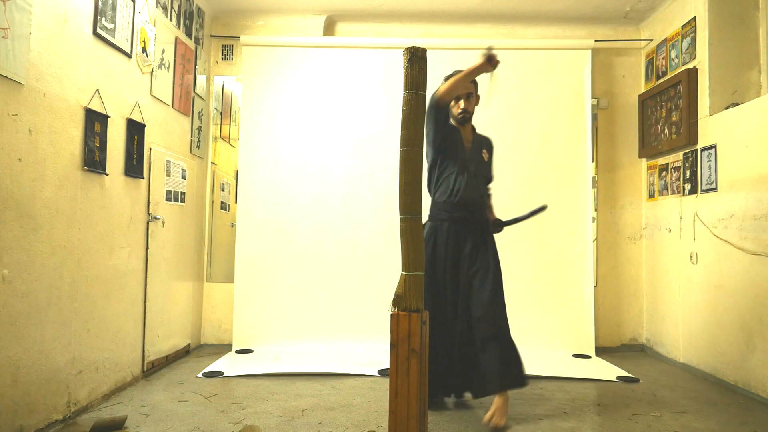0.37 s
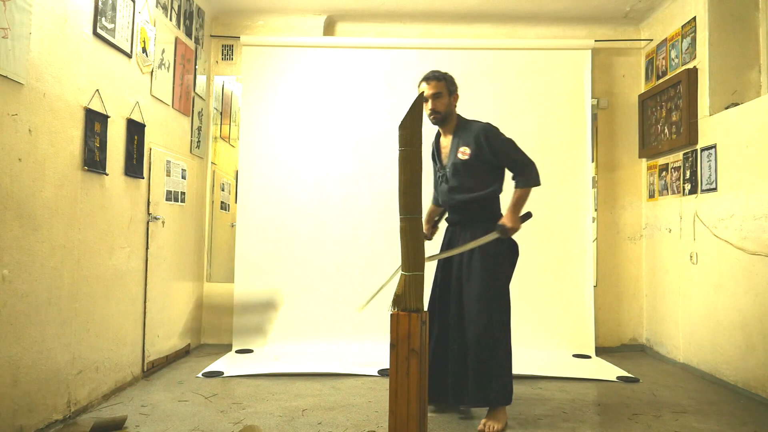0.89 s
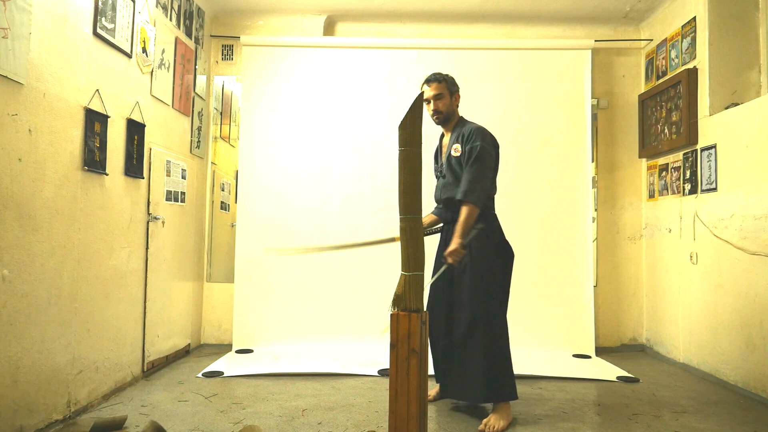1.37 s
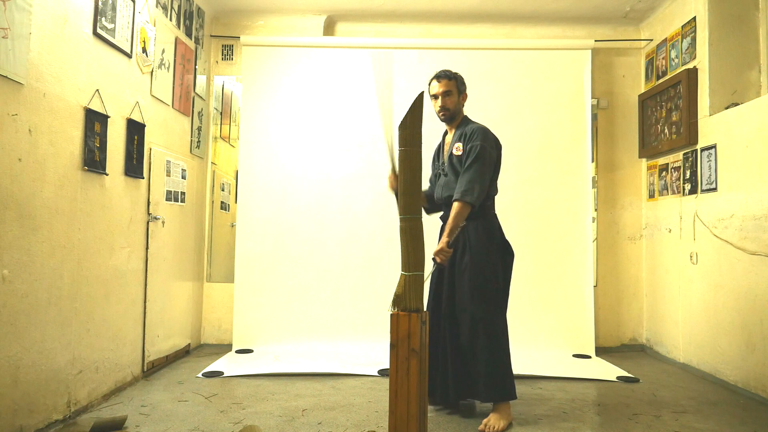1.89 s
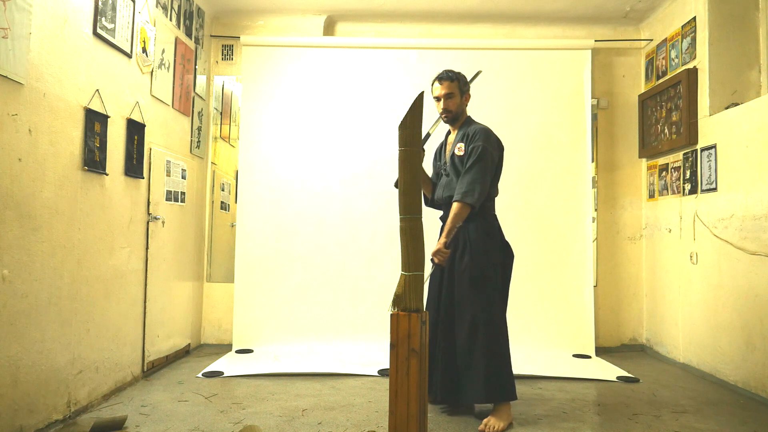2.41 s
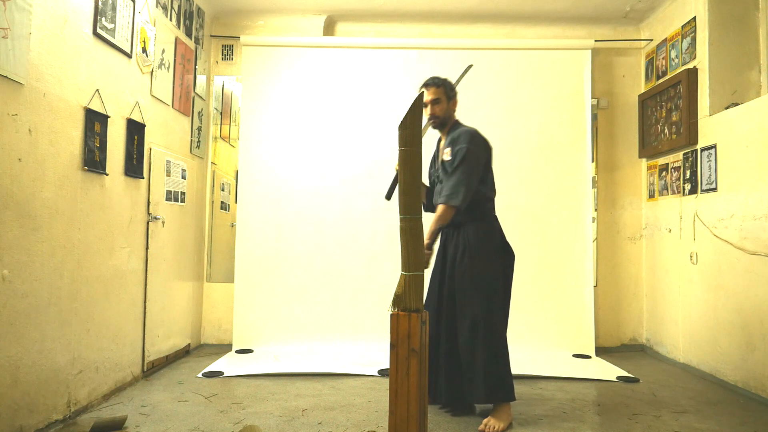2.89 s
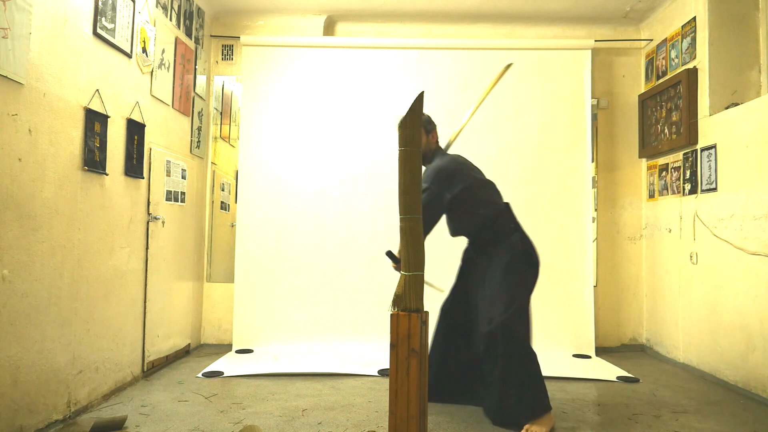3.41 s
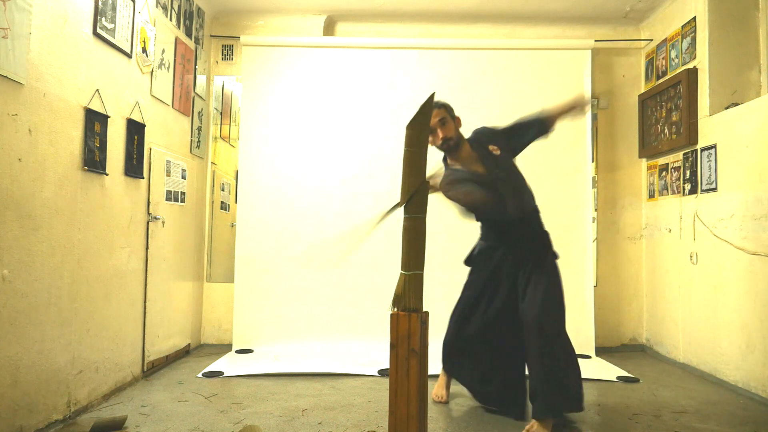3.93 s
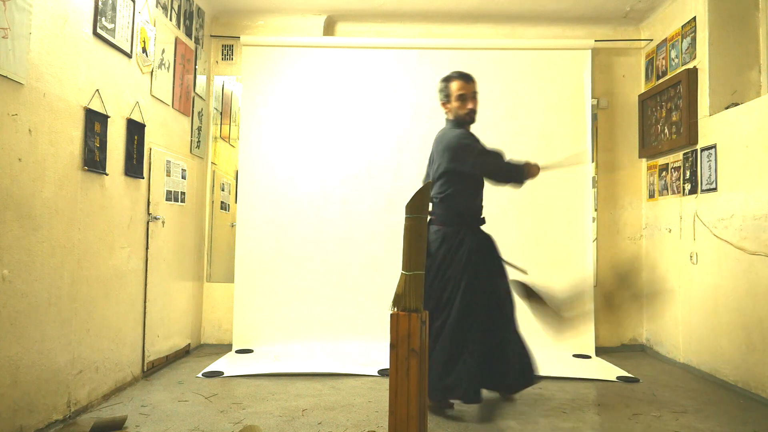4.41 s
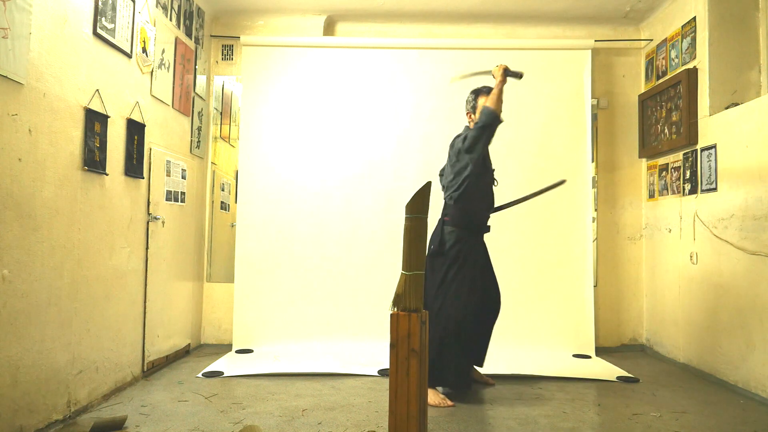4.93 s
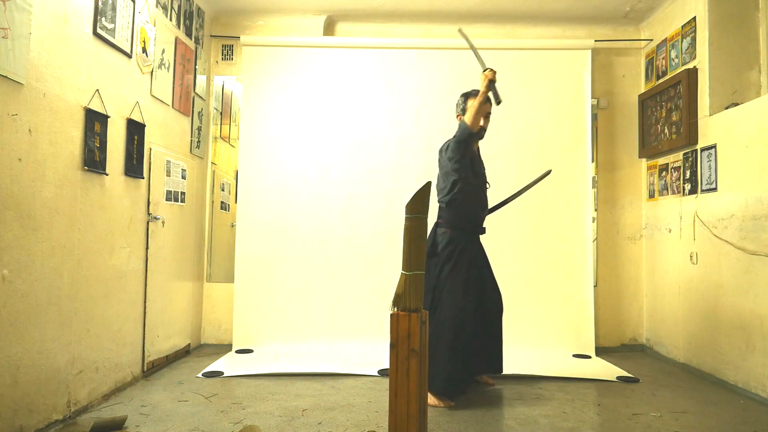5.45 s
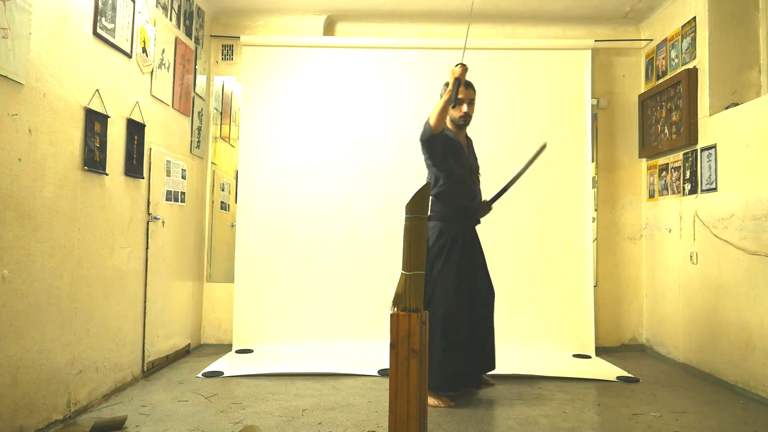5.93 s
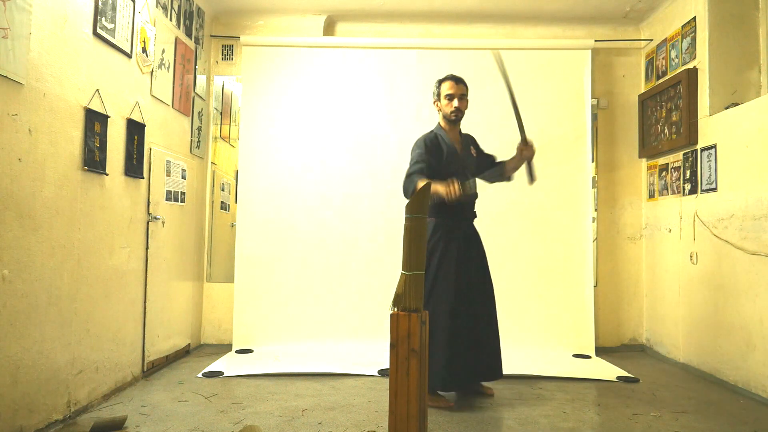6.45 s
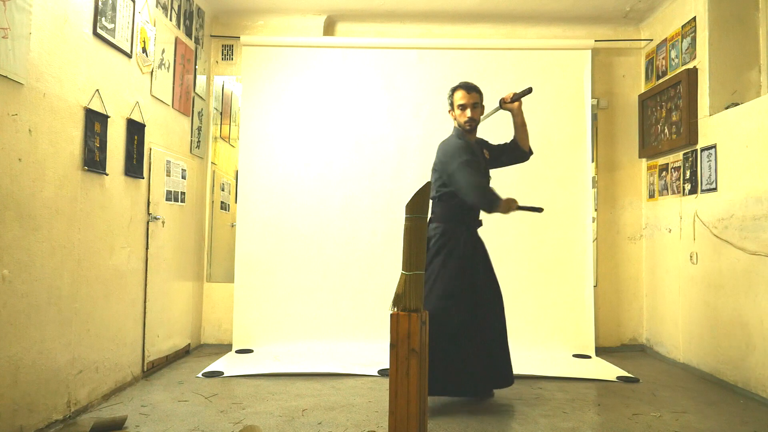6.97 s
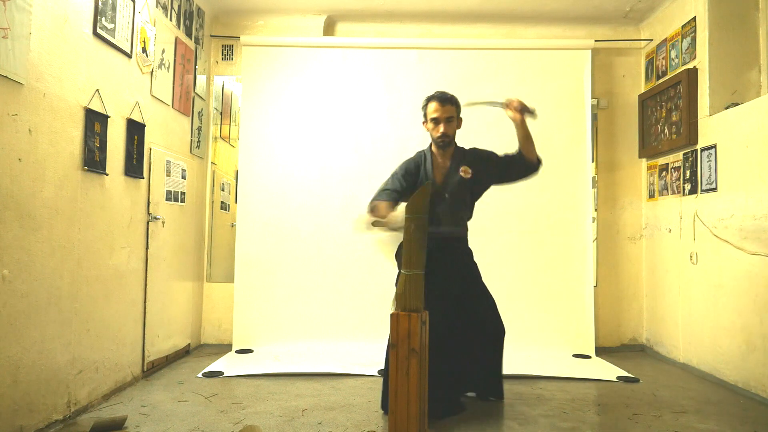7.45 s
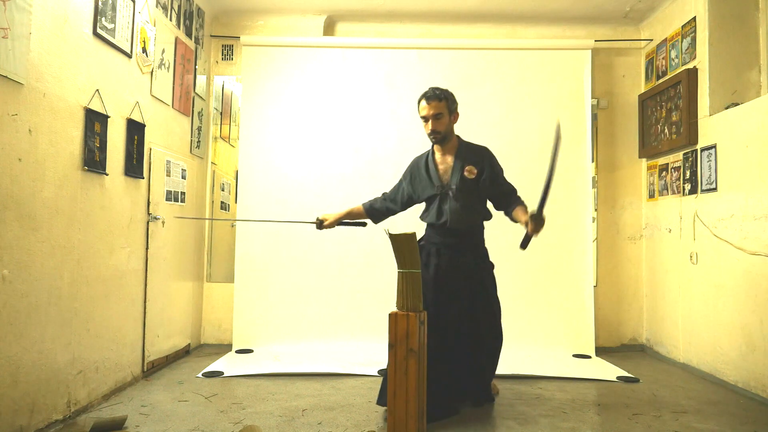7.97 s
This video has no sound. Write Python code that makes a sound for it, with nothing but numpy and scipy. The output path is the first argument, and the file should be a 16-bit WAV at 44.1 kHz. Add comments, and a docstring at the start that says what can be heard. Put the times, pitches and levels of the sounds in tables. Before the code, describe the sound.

Short whistling sword swishes end in crisp cracks through a rolled straw mat; cut pieces thump, tumble and bang in a bare, echoing room.

```python
"""A blade cuts a rolled straw mat in a bare concrete hall: it swishes, the fibres crack, the stump knocks.
Cut pieces land, tumble and slide as shaped noise, and one bangs into a hard panel; solid knocks are struck
resonances. All feed a dense noise hall. Feet and cloth rustle over a faint hum and hiss; the recorder's
gain control leans on the loudest hits and lets go as they fade."""
import sys
import numpy as np
from scipy import signal
from scipy.fft import rfft, irfft
from scipy.io import wavfile

SR = 44100
rng = np.random.default_rng(int(sys.argv[2]) if len(sys.argv) > 2 else 0)


def wav_out(sig):
    """Save sig, one row per channel (or a flat mono array), as 16-bit PCM at SR to the path in sys.argv[1]."""
    wavfile.write(sys.argv[1], SR, np.round(np.clip(np.atleast_2d(sig).T, -1, 1) * 32767).astype(np.int16))


def invert_db(level):
    """Linear amplitude ratio for a level in decibels (20 dB per decade), elementwise."""
    return 10 ** (np.asarray(level, dtype=float) / 20)


N = 357210
TIME = np.arange(N) / SR


def rms_one(x):
    """Scale to rms 1."""
    return x / np.sqrt(np.mean(x ** 2) + 1e-20)


def at_hz(points, hz):
    """Read a table on a log-frequency axis."""
    f, value = np.transpose(points)
    return np.interp(np.log(hz), np.log(f), value)


def band(x, low_hz, high_hz):
    """Butterworth band-pass."""
    return signal.sosfilt(signal.butter(2, [low_hz, high_hz], "band", fs=SR, output="sos"), x)


def resonance(x, hz, width_hz):
    """Two-pole resonance, gain about 1 on top."""
    r = np.exp(-np.pi * width_hz / SR)
    feedback = [1, -2 * r * np.cos(2 * np.pi * hz / SR), r * r]
    return signal.lfilter([(1 - r * r) / 2, 0, (r * r - 1) / 2], feedback, x)


def narrow(hz, width_hz):
    """A resonance applied twice: steep skirts."""
    return lambda x: resonance(resonance(x, hz, width_hz), hz, width_hz)


def late(x, s):
    """Delay by s seconds."""
    return np.pad(x, ((0, 0), (round(s * SR), 0)))[:, :N]


def drift(rate):
    """Slow random wander: straight lines between normal draws, rate of them per second."""
    count = int(N / SR * 40)
    return np.interp(TIME * rate, np.arange(count), rng.standard_normal(count))


# stereo width of the steady noises: f/Hz, side over mid level/dB
AIR_SIDE = [(40, 6), (150, 9.5), (500, 7.5), (3000, -4.5), (12000, -9.5)]


def coloured(spectrum):
    """Steady stereo noise of a given spectrum, rms 1."""
    hz = np.maximum(np.arange(N // 2 + 1) * SR / N, 10)
    white = rfft(rng.standard_normal((2, N))) * invert_db(at_hz(spectrum, hz))
    mid = irfft(white[0], N)
    side = irfft(white[1] * invert_db(at_hz(AIR_SIDE, hz)), N)
    return rms_one(mid + side * [[1], [-1]])


# colour of the steady hiss: f/Hz, level per Hz/dB
HISS = [(25, -25), (60, -32), (130, 0), (250, -1), (500, -4.5), (1200, -9), (3000, -12), (7000, -13),
        (9500, -15.5), (13000, -9), (16000, -14.5)]


def hiss():
    """Steady broadband noise under everything."""
    return invert_db(-53.5) * coloured(HISS)


# mains lines: f/Hz, rms level/dB
HUM = [(199.2, -61.5), (398.4, -78.5)]


def hum():
    """Multiples of the mains, wavering a little."""
    lines = sum(invert_db(db) * np.sqrt(2) * np.sin(2 * np.pi * hz * TIME) for hz, db in HUM)
    return lines * invert_db(1.15 * drift(2.1) + [[.3], [-.3]])  # slightly louder on the left


# the recorder's gain is low, at the start and shortly after the bang: start t/s, hold/s, level/dB
LOW_GAIN = [(0.0, 0.56, -3), (5.973, 0.26, -3.5)]
LOW_GAIN_EDGE_S = .12


def low_gain():
    """Recorder gain on all but the movements: low at the start and shortly after the bang, then recovers."""
    gain_db = 0
    for s, hold, db in LOW_GAIN:
        outside_s = np.maximum(s - TIME, TIME - s - hold)
        gain_db = gain_db + db * np.clip(1 - outside_s / LOW_GAIN_EDGE_S, 0, 1)
    return invert_db(gain_db)


# decay time of the echoes: f/Hz, t60/s
HALL_T60 = [(100, 1), (260, 1), (700, 0.79), (1840, 0.73), (4850, 0.73), (12800, 0.62)]
# colour of the echoes: f/Hz, level/dB
HALL_COLOUR = [(60, -11.5), (200, -2), (600, -3.5), (2000, -1), (5000, -1), (11000, 5)]
# stereo width of the echoes: f/Hz, side over mid level/dB
HALL_SIDE = [(40, -8), (100, -7.5), (300, -10), (2000, -8.5), (5000, -10.5), (12000, -5.5)]
# balance of the echoes: f/Hz, left over right level/dB
HALL_LEAN = [(40, 3), (100, -2.5), (400, 1.5), (1500, 1), (3000, 0.9), (6000, 0.5), (10000, -1.5)]
# standing waves: f/Hz, width/Hz, level over the even field/dB
HALL_MODES = [(89.5, 6.5, 6), (141, 26, 1.5), (214, 29, 4.5), (250, 17, 1.5), (402, 21, 0), (513, 50, 0),
              (790, 31, 3)]
EDGES_HZ = 40 * 2 ** (np.arange(27) / 3)  # third-octave bands
HALL_DB, FIRST_ECHO_S = 10.5, .003
EARLY_DB, EARLY_S = 5, 0.011  # extra early energy and its time constant
BOUNCE_S, BOUNCE_DB = .0023, -23  # second path by way of the floor


def hall(energy):
    """Echoes dense as noise: each band stores the energy fed to it and loses it, in uneven clumps."""
    white, out = rng.standard_normal((2, 2, N)), 0
    for k, (low, high) in enumerate(zip(EDGES_HZ, EDGES_HZ[1:])):
        hz = np.sqrt(low * high)
        slow = signal.lfilter([1], [1, -invert_db(-120 / (at_hz(HALL_T60, hz) * SR))], energy[k])
        early = signal.lfilter([1], [1, -np.exp(-1 / (EARLY_S * SR))], energy[k])
        stored = (slow + invert_db(2 * EARLY_DB) * early) / (.1 * SR)
        level = invert_db(at_hz(HALL_COLOUR, hz) + 1.61 * drift(28)) * np.sqrt(stored)
        mid, side = band(white[k % 2] * level, low, high)
        lean = invert_db(at_hz(HALL_LEAN, hz) / 2 * np.array([[1], [-1]]))
        out = out + lean * (mid + invert_db(at_hz(HALL_SIDE, hz)) * side * [[1], [-1]])
    out = out + sum((invert_db(db) - 1) * resonance(out, hz, width_hz) for hz, width_hz, db in HALL_MODES)
    return invert_db(HALL_DB) * late(out + invert_db(BOUNCE_DB) * late(out, BOUNCE_S), FIRST_ECHO_S)


# clothes and feet on the move: start t/s, hold/s, shuffle level/dB, cloth level/dB
MOVES = [(0.0, 0.32, -51.5, -59.5), (0.423, 0.16, -51.5, -57.5), (1.94, .06, -49.5, -44.5),
         (2.99, 0.15, -57, -54.5), (3.154, 0.42, -50, -58.5), (3.674, 0.069, -41, -47.5),
         (4.36, 0.48, -45, -42.5), (6.262, 0.12, -54, -48.5), (6.65, .04, -53, -55.5),
         (6.772, .04, -48, -53.5), (7.025, .03, -59, -51), (7.13, 0.096, -51.5, -55),
         (7.3, .05, -46.5, -52), (7.4, 0.064, -42, -50)]
# colour of the shuffle: f/Hz, level per Hz/dB
SHUFFLE = [(60, -22), (130, -20), (250, -8.5), (400, -11), (700, -14.5), (1500, -17), (3000, -19),
           (6000, -34)]
# colour of the cloth: f/Hz, level per Hz/dB
CLOTH = [(710, -11), (1200, -17.5), (1560, -8.5), (3310, -7), (5500, -4), (7960, -3.5), (8940, 1),
         (12000, -10), (15500, -9)]
RISE_DB_PER_S, FADE_DB_PER_S = 118, 73
STILL_SHUFFLE_DB, STILL_CLOTH_DB = -68, -67  # standing still


def moves():
    """Low shuffle of feet and heavy fabric, bright rustle of sleeves; moves swell, hold, fade, flicker."""
    s, hold, shuffle_db, cloth_db = np.transpose(MOVES)[:, :, None]
    swell_db = -RISE_DB_PER_S * np.maximum(s - TIME, 0)
    shape_db = swell_db - FADE_DB_PER_S * np.maximum(TIME - s - hold, 0)
    shuffle_db = np.maximum(np.max(shape_db + shuffle_db, axis=0), STILL_SHUFFLE_DB)
    cloth_db = np.maximum(np.max(shape_db + cloth_db, axis=0), STILL_CLOTH_DB)
    shuffle = invert_db(shuffle_db + 2.8 * drift(22)) * coloured(SHUFFLE)
    return shuffle + invert_db(cloth_db + 0.317 * drift(12)) * coloured(CLOTH)


def knock(s, db, hz, width_hz, direct_db):
    """One hard contact ringing one resonance; the third item lifts the direct sound over the hall."""
    return narrow(hz, width_hz), invert_db(db) * (np.arange(N) == round(s * SR)), invert_db(direct_db)


# bare feet set down: t/s, impulse level/dB
STEPS = [(3.15, -25), (3.24, -37), (3.36, -30), (6.685, -25)]


def steps():
    """Each footfall is one impulse through a broad low resonance."""
    return [knock(s, db, 350, 350 * 0.46, direct_db=-6.0) for s, db in STEPS]


# the blade is touched: t/s, level/dB
TOUCHES = [(1.984, 2), (2.085, -6.5)]
# modes of the blade: f/Hz, width/Hz, impulse level/dB
BLADE = [(3380, 27, -32.5), (3830, 20, -36)]


def touches():
    """The touched blade rings in lightly damped modes."""
    return [knock(s, db + mode_db, hz, w, direct_db=7.5) for s, db in TOUCHES for hz, w, mode_db in BLADE]


# heavy landings on the floor: t/s, impulse level/dB, f/Hz, direct over hall level/dB
BOOMS = [(0.559, -10, 251, -1), (1.039, -10.5, 134, 11), (1.051, -5.5, 242, -4), (4.801, 2.5, 98, -18),
         (4.83, -4.5, 203, 12.5), (4.914, 0.5, 222, 5.5), (5.416, 1, 135, -15.5), (5.59, -3.5, 143, -13)]


def booms():
    """Heavy landings set the floor booming, each in one wide low mode."""
    return [knock(s, db, hz, hz * 0.44, direct_db) for s, db, hz, direct_db in BOOMS]


# single knocks and ticks: parts of the cuts, pieces landing, small contacts:
# t/s, impulse level/dB, f/Hz, width/Hz, direct over hall level/dB
KNOCKS = [(.5455, -1, 1030, 500, 9.5), (.876, -14, 2920, 2340, -3), (.971, -13, 800, 700, -2),
          (0.976, -18.5, 1960, 900, 1), (1.037, 4.5, 1240, 910, 7.5), (1.04, 1.5, 647, 250, 9.5),
          (1.314, -6, 790, 150, 4.5), (1.36, -15, 800, 250, 7.5), (1.383, -26, 2960, 3000, 10.5),
          (1.578, -16, 2200, 710, 1), (1.985, -17.5, 7000, 2500, 6), (3.732, 8.5, 4100, 1620, 5),
          (4.598, -5, 5300, 1500, 8.5), (4.626, 1, 905, 300, 4.5), (5.121, -14.5, 1315, 199, 10.5),
          (6.80, -17, 2500, 1400, 2.5), (7.04, -29, 8500, 3000, 0), (7.597, -14, 1800, 700, 8),
          (7.902, -17.5, 980, 900, 6), (7.966, 1, 1120, 896, -1)]


def single_knocks():
    """Each knock or tick rings one resonance."""
    return [knock(*row) for row in KNOCKS]


def blow(s, length, sharp):
    """Force that rises sharp times faster than it dies away over the length of the contact."""
    since = np.clip(TIME - s, 0, 1)
    return (1 - np.exp(-since * sharp / length)) * np.exp(-since / length)


def straw(x):
    """Broad crack of the straws: a band-pass applied twice."""
    return band(band(x, 510, 4360), 510, 4360)


def thud(x):
    """Low, dull weight of a blow."""
    return band(band(x, 103, 270), 79, 248)


# hollow body of the roll: f/Hz, width/Hz, level/dB
MAT = [(403, 386, 14.5), (540, 150, 11.5), (800, 100, -23)]


def mat_body(x):
    """The hollow roll resonates in a few wide modes."""
    return sum(invert_db(db) * narrow(hz, width_hz)(x) for hz, width_hz, db in MAT)


def bursts(rows, crack, sharp, hiss_db, hollow):
    """Crack, thud, mat body and hiss (less hiss, the hollower the blow): pairs of filter and force."""
    voices = (crack, thud, mat_body, lambda x: band(x, 4200, 9300))
    s, crack_db, thud_db, body_db, length = np.transpose(rows)
    bright_db = crack_db + hiss_db - hollow * (body_db - crack_db)
    levels = invert_db(np.array([crack_db, thud_db, body_db, bright_db]))
    forces = levels @ [blow(*contact, sharp) for contact in zip(s, length)]
    return list(zip(voices, forces))


# pieces sliding and rolling: t/s, crack level/dB, thud level/dB, mat body level/dB, length/s
SLIDES = [(1.06, -29.5, -56, -40, 0.11), (1.585, -28, -68, -45, 0.029), (4.63, -21, -34, -37, 0.051),
          (5.06, -27.5, -34, -35.5, 0.1), (5.345, -4, -38, -10, 0.013), (5.41, -19, -43, -13.5, 0.042),
          (5.52, -49.5, -38.5, -48, 0.25)]


def slides():
    """Sliding and rolling contact: softer onsets and a narrower crack."""
    return bursts(SLIDES, narrow(1100, 1400), sharp=0.56, hiss_db=-17.5, hollow=0.46)


# pieces landing and tumbling: t/s, crack level/dB, thud level/dB, mat body level/dB, length/s
FALLS = [(1.0289, -4, -38, -9.5, 0.0058), (1.38, -43.5, -43, -51, 0.063), (1.567, -29, -45, -29, 0.0081),
         (1.637, -20, -60, -40, 0.004), (1.988, -37.5, -65, -56, 0.0044), (4.593, -11, -43, -13.5, 0.0068),
         (4.623, -12.5, -29, -17.5, 0.0097), (4.7944, -16, -15.5, -15, 0.017),
         (4.9025, -13, -45, -32.5, 0.018), (6.7986, -29, -44, -51, 0.0045), (6.874, -42, -38.5, -47, 0.014),
         (7.93, -19.5, -36, -17.5, 0.023), (7.9563, -9.5, -29, -26, 0.0067)]


def falls():
    """Cut pieces land and tumble: straw crackle with a fairly soft onset."""
    return bursts(FALLS, straw, sharp=0.88, hiss_db=-6.5, hollow=0.26)


# a piece strikes a hard panel: t/s, crack level/dB, thud level/dB, mat body level/dB, length/s
BANG = [(5.2453, 5.505, -25.5, -11, 0.0019)]


def bang():
    """Hard, short contact: a sharp, bright crack."""
    def crack(x):
        return band(band(x, 1000, 5550), 1000, 5680)
    return bursts(BANG, crack, sharp=10.5, hiss_db=-7.5, hollow=0)


# modes of the panel: f/Hz, width/Hz, impulse level over the crack/dB
PANEL = [(2406, 264, 6), (4140, 740, -20)]


def panel():
    """The struck panel rings just after first contact."""
    return [knock(s + 0.001105, db + mode_db, hz, w, direct_db=10.5)
            for s, db, *_ in BANG for hz, w, mode_db in PANEL]


# blade through the air: cut t/s, rise/s, whistle f at the cut/Hz, width/Hz, level/dB
SWISH = [(0.545, 0.035, 1140, 350, -42), (3.722, 0.063, 350, 297, -51), (4.01, 0.016, 920, 497.6, -52),
         (7.463, 0.042, 1310, 300, -44.5)]
GLIDE_S, STAGE_S = 0.19, 0.023  # time to climb by a factor e; steps of the climb


def swish():
    """Vortices shed by the blade whistle, swelling and climbing with its speed until the mat stops them."""
    out = []
    for s, rise, hz, width_hz, db in SWISH:
        swell = invert_db(db) * np.exp(np.minimum(TIME - s, 0) / rise) * (TIME < s)
        for k in range(4):  # stages counted back from the cut, crossfaded
            fade = np.sqrt(np.clip(1 - np.abs((s - TIME) / STAGE_S - k), 0, 1))
            out.append((narrow(hz * np.exp(-k * STAGE_S / GLIDE_S), width_hz), swell * fade))
    return out


# blade through the mat: t/s, crack level/dB, mat body level/dB, stump impulse level/dB, length/s
CUTS = [(.5431, -12.5, -20, -5.5, 0.0036), (3.721, -12.5, -13.5, 0, 0.0045),
        (4.008, -14.5, -31.5, -0.2, 0.0097), (7.4633, -9, -9, 6.5, 0.004)]


def cuts():
    """The blade snaps the fibres: sharp straw crack over a thud and the hollow body."""
    rows = [(s, db, db - 22, body_db, length) for s, db, body_db, _, length in CUTS]  # thud under the crack
    return bursts(rows, straw, sharp=9.2, hiss_db=-1.0, hollow=.1)


# modes of the standing stump: f/Hz, width/Hz, level/dB
STUMP = [(473, 240, 0.5), (960, 560, -10.5), (1640, 330, -8.5)]


def stump():
    """The standing stump knocks in its modes just after first contact."""
    return [knock(s + 0.001586, db + mode_db, hz, w, direct_db=10.5)
            for s, _, _, db, _ in CUTS for hz, w, mode_db in STUMP]


def scene():
    """Blows snap clumps of straws, heard direct and through the hall, over movement, hum and hiss."""
    noisy = slides() + falls() + bang() + swish() + cuts()
    solid = steps() + touches() + booms() + single_knocks() + panel() + stump()
    clumps_db = 1.1 * np.minimum(rng.exponential(1, N), 4)
    straws = rms_one(rng.standard_normal(N) * invert_db(clumps_db))
    click = (np.arange(8192) == 0) * 1.
    bins = np.round(EDGES_HZ * 8192 / SR).astype(int)
    direct, energy = np.zeros(N), np.full((len(bins) - 1, N), 1e-24)
    for voice, force, grain in [(*pair, straws) for pair in noisy] + solid:
        power = np.abs(rfft(voice(click))) ** 2
        direct += voice(grain * force + 1e-18) / np.sqrt(power.mean())
        share = [power[a:b].mean() / power.mean() for a, b in zip(bins, bins[1:])]
        busy = np.flatnonzero(force > 1e-6)
        energy[:, busy] += np.outer(share, force[busy] ** 2)  # what each hall band receives
    return moves() + low_gain() * (direct + hall(energy) + hum() + hiss())


def low_pass(x):
    """Removes everything above the highest recorded frequency."""
    return signal.sosfilt(signal.butter(12, 16460, fs=SR, output="sos"), x)


HOLD_DB, SQUEEZE = -17, 0.77  # threshold; dB of cut per dB over it
ATTACK_S, RELEASE_DB_PER_S = 0.0065, 55


def record(dry):
    """Microphone roll-off and a narrow dip, gain control, soft overload."""
    x = signal.sosfilt(signal.butter(6, 10300, fs=SR, output="sos"), dry) + invert_db(-26.5) * dry
    x = x - 0.78 * resonance(x, 7890, 150)
    smooth = np.exp(-1 / (ATTACK_S * SR))
    power = signal.lfilter([1 - smooth], [1, -smooth], np.mean(x ** 2, axis=0))
    over_db = np.maximum(10 * np.log10(power + 1e-12) - HOLD_DB, 0)
    release_db = RELEASE_DB_PER_S * TIME
    cut_db = np.maximum.accumulate(SQUEEZE * over_db + release_db) - release_db  # straight-line release
    mix = 1.03 * np.tanh(x * invert_db(-cut_db) / 1.147)
    return low_pass(mix)


dry = scene()
out = record(dry)
wav_out(out)
```